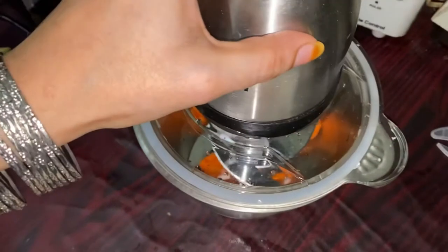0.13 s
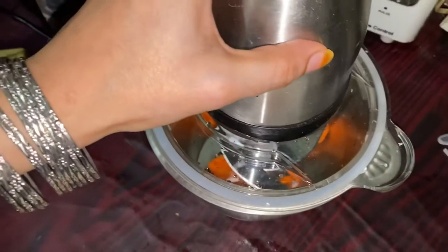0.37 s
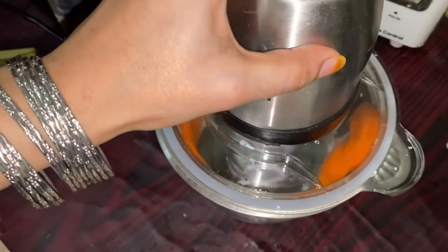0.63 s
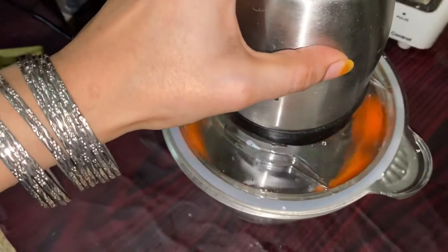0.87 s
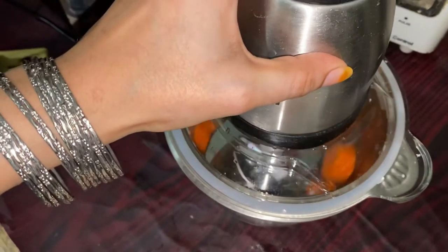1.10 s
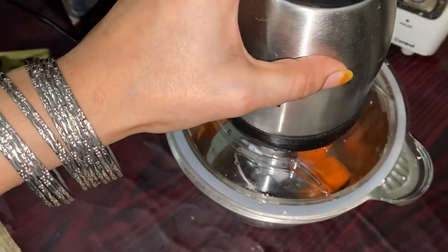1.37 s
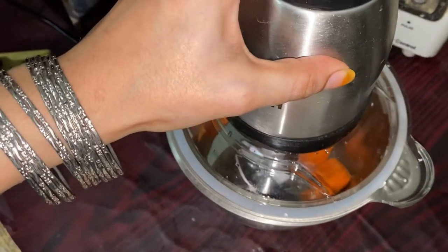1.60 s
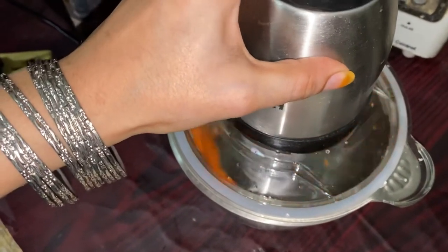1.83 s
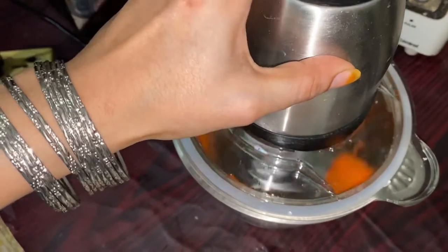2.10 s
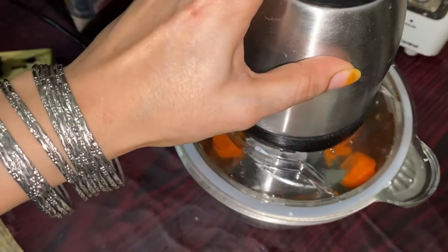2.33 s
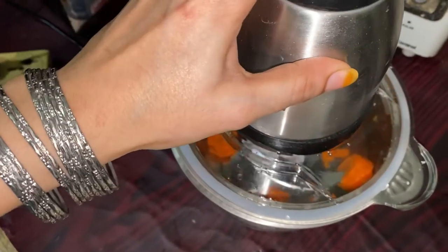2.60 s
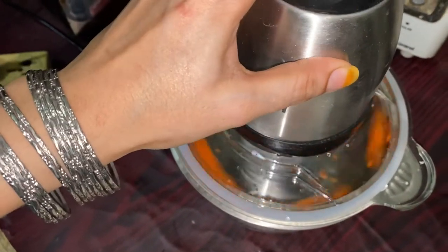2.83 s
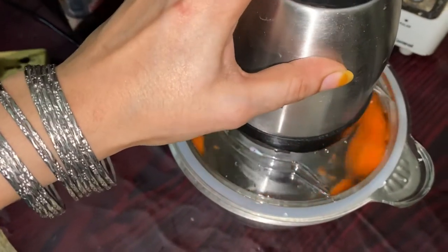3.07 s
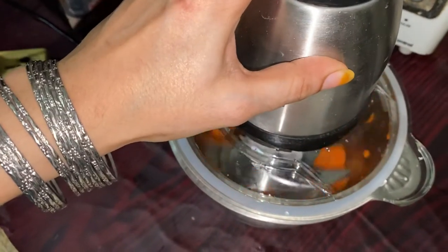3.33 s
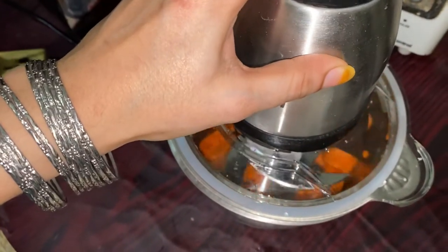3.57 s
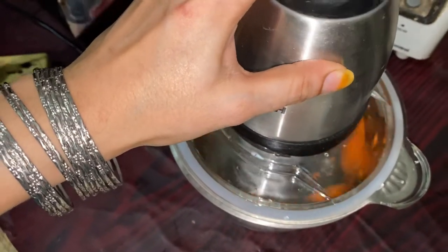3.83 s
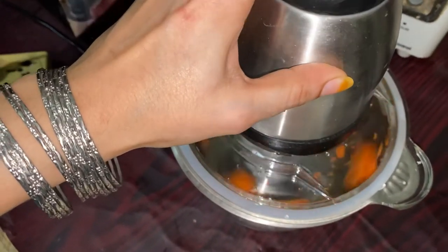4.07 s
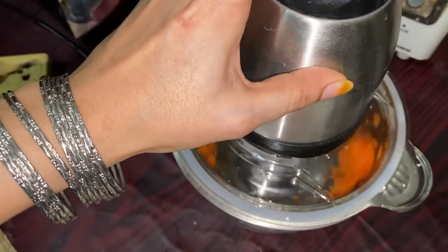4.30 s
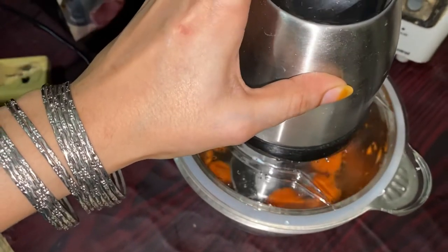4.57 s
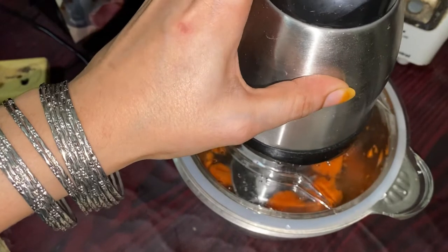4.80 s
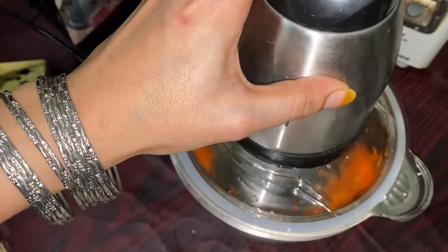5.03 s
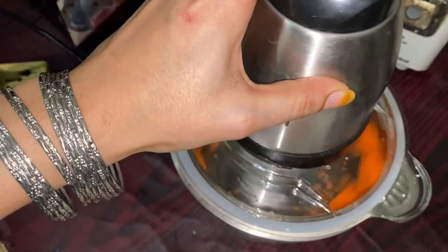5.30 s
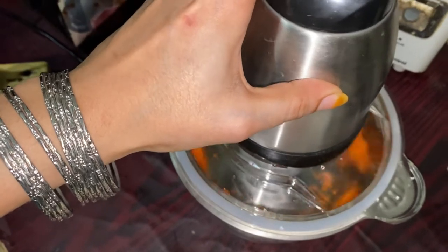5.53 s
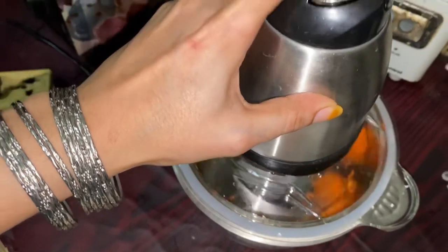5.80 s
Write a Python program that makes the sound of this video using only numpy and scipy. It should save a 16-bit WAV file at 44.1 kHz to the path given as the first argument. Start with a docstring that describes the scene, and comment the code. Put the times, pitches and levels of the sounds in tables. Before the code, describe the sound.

In a quiet room, thin metal bangles tick faintly, then an electric food chopper runs in five short bursts. Each time the geared motor whines upward, hard vegetable pieces knock and rattle loudly in the bowl, and the motor coasts down as they settle. Small metallic ticks fill the pauses. Close stereo pickup, slight dull room tail.

```python
"""Thin metal bangles tick in a quiet room, then a hand pulses an electric chopper over hard vegetable pieces
in a lidded bowl on a table. In each of five pulses the geared motor spins up: gears whine and grind, and the
unbalanced blade shaft throbs. Struck pieces knock and rattle round the bowl as noise bursts through resonances.
After switch-off the motor coasts down in pitch and the pieces settle. Bangles, made of noisy cracks and paired
sine tones, tick again in the pauses; filtered noise makes the quiet room throughout."""
import sys
import numpy as np
from scipy import signal
from scipy.fft import rfft, irfft
from scipy.io import wavfile
from scipy.ndimage import uniform_filter1d

SR = 44100
rng = np.random.default_rng(int(sys.argv[2]) if len(sys.argv) > 2 else 0)


def int16_out(signal):
    """Quantize to a 16-bit WAV file."""
    q = np.round(np.clip(np.atleast_2d(signal).T, -1, 1) * 32767)
    wavfile.write(sys.argv[1], SR, q.astype(np.int16))


def gain_from_db(level_db):
    """Convert decibel levels to linear amplitude factors (20 dB per decade)."""
    decades = np.asarray(level_db, float) / 20
    return 10 ** decades


N = 260631  # length in samples

# switch pulses: (on t/s, off t/s, spin-up time constant/s, coasting time constant/s)
SWITCH_PULSES = [(0.44, 0.64, .15, .3), (1.60, 1.805, .15, .25), (2.635, 2.865, .125, .25),
                 (3.545, 3.855, .125, .25), (4.895, 5.40, .138, .27)]
# work in the bowl, one row a pulse, levels at full speed:
# (blades bite t/s, pieces tumble on after switch-off/s, rattle level/dB, grind level/dB, throb level/dB)
BOWL_WORK = [(0.456, 0.35, -18, -28, -17), (1.616, 0.43, -17.5, -26.5, -24.5), (2.65, 0.35, -18, -27, -20),
             (3.55, 0.45, -18.5, -27, -17.5), (4.924, 0.39, -17, -28, -19)]
# how rattle, grind and throb follow the motor, one row each:
# (gain per doubling of speed/dB, loss while coasting/(dB/s), further loss once the pieces settle/(dB/s))
SPEED_RESPONSE = [(2.0, 20.5, 138), (4.0, 59, 171.5), (13.0, 39.5, 35)]
# loudest pieces struck or landing: (t/s, bowl peak level/dB, housing level/dB, table thud level/dB)
# housing and thud peaks are relative to the bowl peak
PIECE_KNOCKS = [(0.473, -6, -12, -14), (0.535, 0.5, -20.5, -23.5), (0.576, -10.5, -21.5, -12.5),
                (0.602, -13.5, -13, -18), (0.628, -19, -12, -12.5), (0.676, -12.5, -17, -12),
                (0.734, -20, -26, -13.5), (0.77, -15, -19, -13.5), (0.83, -12, -19, -10.5),
                (0.903, -11.5, -30, -16.5), (0.944, -16.5, -30, -12.5), (0.969, -14.5, -25, -13.5),
                (1.044, -25, -24, -7), (1.094, -29.5, -36, -6), (1.146, -27, -42, 0),
                (1.26, -44.5, -33, 11.5), (1.623, -8, -12, -15.5), (1.667, -4, -8, -15.5),
                (1.729, -10, -19, -16.5), (1.82, -1.5, -22.5, -24), (1.855, -10.5, -21.5, -13.5),
                (1.893, -9, -10, -10.5), (1.912, -7, -16, -11), (1.994, -16.5, -12, -13),
                (2.025, -9.5, -22, -14.5), (2.073, -17.5, -11, -21), (2.114, -16.5, -25, -18),
                (2.145, -19.5, -24, -16), (2.178, -27, -33, -8), (2.23, -13.5, -39, -9.5),
                (2.29, -16.5, -34, -3.5), (2.339, -25, -38.5, 1.5), (2.677, -15.5, -15, -6.5),
                (2.705, -22, -10.5, -6), (2.739, -4.5, -3.5, -17), (2.778, -13.5, -10, -13.5),
                (2.799, -6, -17, -15.5), (2.833, -4, -15.5, -18), (2.911, -5.5, -26, -15.5),
                (2.95, -8.5, -29, -20), (3.083, -8, -29, -9), (3.157, -15.5, -24, -16),
                (3.179, -17.5, -25, -10.5), (3.215, -22.5, -27, -11), (3.249, -31, 4, -6),
                (3.39, -41.5, -24, 11.5), (3.574, -15, -18, -19.5), (3.612, -15, -12, -16.5),
                (3.779, -6.5, -12, -13.5), (3.81, -5.5, -9, -9), (3.921, -11, -15, -3),
                (3.984, -13.5, -13, -12), (4.095, -7, -10, -15), (4.169, -13, -14, -16),
                (4.207, -34, -24, -1), (4.264, -25.5, -12, -9), (4.286, -16.5, -20, -17.5),
                (4.339, -21.5, -35, -6), (4.44, -23.5, -25, -10), (4.463, -32, -31, 5),
                (4.536, -35.5, -37, 2.5), (4.934, -15, -22, -10), (4.978, -4.5, -19, -17),
                (5.156, -10.5, -20, -12), (5.292, -4, -14, -16), (5.341, -8.5, -19, -9.5),
                (5.467, -11.5, -20, -3.5), (5.649, -11.5, -10, -16.5), (5.684, -17.5, -11, -15),
                (5.79, -33, 1, -5), (5.836, -27.5, -25, -15.5), (5.854, -21, -17, -22.5)]
# shaft throb: (multiple of the blade turn rate, level/dB)
SHAFT_TONES = [(1, -18), (2, 0), (3, -11), (4, -8)]
# resonances of bowl, lid and table: (f/Hz, width/Hz, level/dB)
BOWL_MODES = [(92.5, 37, -8), (180.4, 34, -4.5), (267, 38, 0.5), (347.4, 61, 2), (430, 97.4, -1.5),
              (625, 122, -6), (890.6, 128, -5), (1196, 212, -5), (1958, 258, -9.5), (2770, 120, -44),
              (3600, 150, -27.5), (6818, 333, -3)]
# resonances of the motor housing: (f/Hz, width/Hz, level/dB)
HOUSING_MODES = [(2008, 908, 2), (3070, 713, 3), (3654, 240, 2), (4473, 550, -3), (5950, 1370, -9.5),
                 (7130, 950, -21), (10600, 2000, -58.5), (14500, 2300, -65)]
# thud through the bowl's foot: (f/Hz, width/Hz, level/dB)
TABLE_MODES = [(87, 40, 2.5), (173, 41, 6)]
# bangle ticks: (t/s, ring level/dB, f/Hz, time to fall 60 dB if not damped/s, crack level ahead of its resonances/dB)
BANGLE_TICKS = [(0.114, -70, 2460, 0.051, -57), (0.176, -66, 2500, .05, -57), (0.225, -71, 1910, .05, -47),
                (0.271, -73.5, 4050, .05, -47), (1.031, -57, 2740, 0.84, -50),
                (1.492, -58.5, 4650, 0.17, -38.5), (2.24, -66, 3600, 0.23, -57),
                (2.4, -69, 1870, .3, -65.5), (2.564, -67, 2400, 0.041, -41), (3.414, -57, 2720, 0.13, -42),
                (3.428, -60, 1750, 0.82, -71), (4.47, -55, 1780, 0.34, -65), (4.773, -48, 4330, 0.036, -47)]
# colour of the quiet room: (f/Hz, level per Hz/dB), relative
ROOM_COLOUR = [(15, -42.5), (25, -11.5), (80, -3), (124, -14.5), (527, -26.5), (648, -31.5), (718, -30),
               (776, -27.5), (1970, -39.5), (2750, -52), (4270, -52.5), (5120, -63), (12000, -63.5),
               (15600, -100.5), (22000, -120)]
# response of the sum of both microphones, with notches where they cancel: (f/Hz, level/dB)
MIC_SUM = [(100, 1), (7000, -4.5), (8200, -2.5), (9100, -24), (10000, -3), (12000, -10), (13200, -22.5),
           (14500, -12), (16000, -19)]
# stereo width: (f/Hz, level of the side signal/dB)
STEREO_WIDTH = [(30, 8), (60, -17.5), (110, -12), (200, -9), (380, -5.5), (700, -0.5), (1290, -4),
                (2380, -7), (4400, -3.5), (6000, 2), (8000, -8), (9100, 28), (10500, -13), (13000, 3),
                (15000, -2)]
# part of the side signal that follows the mid: (f/Hz, share 0-1, phase/rad)
SIDE_TIED_TO_MID = [(60, .6, 3.5), (130, 0.4, -5), (260, 0.4, 0.5), (550, 0.7, -1.5), (1111, 0.6, -2),
                    (2200, .6, -2), (4400, 0.9, -1.16), (7000, .7, -2), (12000, .8, -1.5)]

TOP_MESH_HZ = 3600   # tooth contacts per second that the motor heads for
MESH_PER_TURN, TEETH = 70.0, 12.0   # tooth contacts per blade turn, per rotor turn
WHINE_DB, STARTING_DB = -28.5, 3.5   # the gears are loaded harder while the motor gathers speed
BITE_S = 0.0061   # sound swells as the blades meet the pieces
DAMPED_AFTER_S = 0.11   # skin stops a ringing bangle
ROOM_DB = -52.5


def spin():
    """The gear pitch climbs while the switch is held and decays after release; whine level follows."""
    t = np.arange(N) / SR
    mesh_hz, whine_db = np.zeros(N), np.full(N, -120.)
    for on, off, rise, coast in SWITCH_PULSES:
        after = t > on
        coasting = np.maximum(t - off, 0)
        powered_speed = 1 - np.exp(-(np.clip(t, on, off) - on) / rise)
        speed = powered_speed * np.exp(-coasting / coast)
        mesh_hz[after] = TOP_MESH_HZ * speed[after]
        starting_db = STARTING_DB * (1 - speed) * (t < off)
        unloaded_db = -35 * coasting - 70 * coasting ** 2   # tooth load fades while coasting
        backlash_db = -60 * np.exp(-(np.abs(t - on) / .03) ** 4)   # teeth meet once the slack is taken up
        whine_db[after] = (WHINE_DB + starting_db + unloaded_db + backlash_db)[after]
    return mesh_hz, whine_db


def work(mesh_hz):
    """Rattle, grind and throb levels rise with speed, fall while coasting, and fall faster once pieces settle."""
    t = np.arange(N) / SR
    levels_db = np.full((3, N), -150.)
    per_doubling, coast_db, settle_db = np.transpose(SPEED_RESPONSE)[:, :, None]
    for (bite, tumble, *top_db), (on, off, rise, coast) in zip(BOWL_WORK, SWITCH_PULSES):
        now = t[t > bite]
        doublings = np.log2(1 - np.exp(-(np.minimum(now, off) - on) / rise))
        swell_db = 20 * np.log10(1 - np.exp(-((now - bite) / BITE_S) ** 2) + 1e-6)
        coast_loss_db = coast_db * np.maximum(now - off, 0)
        settle_loss_db = settle_db * np.maximum(now - off - tumble, 0)
        speed_db = per_doubling * doublings
        levels_db[:, t > bite] = np.c_[top_db] + speed_db + swell_db - coast_loss_db - settle_loss_db
    return levels_db


def whine(turns, level_db):
    """Tooth contacts make a gritty band round the mesh rate, since every pair meets with another force."""
    runout = .17 * np.sin(2 * np.pi * MESH_PER_TURN / TEETH * turns)   # the rotor runs slightly off centre
    mesh_phase = 2 * np.pi * (MESH_PER_TURN * turns + runout)
    force = [.8 + .8 * drift(115.0) + .8j * drift(115.0) for row in range(2)]
    chopping_db = 2.5 * drift(30.0)   # each cut loads the gears
    return gain_from_db(level_db + chopping_db) * np.real(force * np.exp(1j * mesh_phase))


def grind(turns, level_db):
    """Gears, brushes and the blade edge make dense fine grains that ring in the housing."""
    uneven_db = 1.9 * drift(40.0) + 0.5 * np.cos(4 * np.pi * turns)   # twice a blade turn
    fine = grains(9000., spread_db=0.5) * gain_from_db(uneven_db)
    ringing = evened(body(fine, HOUSING_MODES), seconds=0.48)
    return gain_from_db(level_db + 2.0) * ringing   # 2 dB on top of the table's level


def throb(turns, mesh_hz, level_db):
    """Blade unbalance shakes the table, and takes over the bass from random bumps as the speed rises."""
    share = np.clip((mesh_hz - 2000.) / 1200.0, 0, 1)
    tones = 0
    for multiple, db in SHAFT_TONES:
        strength = gain_from_db(db + 1.1 * drift(9.6))
        tones = tones + strength * np.sin(2 * np.pi * multiple * turns + 0.56 * drift(11.0))
    table = [(86.0, 33, -3.5), (183, 40.8, 5.0)]   # f/Hz, width/Hz, level/dB
    bumps = evened(body(grains(300., spread_db=2.0), table), seconds=0.39)
    direct_tones = np.sqrt(2) * tones * [[1], [0]]   # no scattered twin
    return gain_from_db(level_db) * (share * direct_tones + (1 - share) * 0.98 * bumps)


def rattle(turns, mesh_hz, level_db):
    """Pieces hit blade and wall in clumps, most often as a blade passes; they thin out as the blades slow."""
    passing = (1 + 0.64 * np.cos(4 * np.pi * turns)) * gain_from_db(4.0 * drift(25.0))   # two passes a turn
    hits = soft(grains(.7 * (mesh_hz + 300.) * passing, spread_db=2.5), cut_hz=1740.0)
    slowing = np.gradient(mesh_hz) < 0
    settling_db = -7 * np.clip(1 - mesh_hz / 1500, 0, 1) ** .5 * slowing
    smooth_db = uniform_filter1d(settling_db, size=400)
    return gain_from_db(level_db + smooth_db) * evened(body(hits, BOWL_MODES), seconds=0.13)


def knocks():
    """Each knock is a few contacts dying within milliseconds, ringing bowl, housing and table."""
    length = 4000   # samples
    out, t = np.zeros((2, N + length)), np.arange(length) / SR
    hit, rocking = np.exp(-t / 0.0035), 0.18 * np.exp(-t / 0.026)
    envelope = (1 - np.exp(-t / 0.00065)) * (hit + rocking)
    noises = rng.standard_normal((len(PIECE_KNOCKS), 2, length))
    for (s, peak_db, bright_db, thud_db), noise in zip(PIECE_KNOCKS, noises):
        blow = noise * envelope
        dull = body(soft(soft(blow, cut_hz=1310.0), cut_hz=2500.0), BOWL_MODES)
        bright = body(soft(blow, cut_hz=4000.0), HOUSING_MODES)
        thud = body(blow, TABLE_MODES)
        knock = dull / np.abs(dull).max()
        knock = knock + gain_from_db(bright_db) * bright / np.abs(bright).max()
        knock = knock + gain_from_db(thud_db) * thud / np.abs(thud).max()
        start = round(s * SR)
        out[:, start:start + length] += gain_from_db(peak_db) * knock
    return out[:, :N]


def bangles():
    """A tick is a short noisy crack and a thin-metal mode with a weak close partner."""
    out, t = np.zeros((2, N + SR)), np.arange(SR // 2) / SR
    crack_fade = np.exp(-t / 0.0013) + 0.085 * np.exp(-t / .02)
    cracks = rng.standard_normal((len(BANGLE_TICKS), 2, len(t))) * crack_fade
    phases = rng.random((len(BANGLE_TICKS), 2))   # in cycles
    damping_db = -900. * np.maximum(t - DAMPED_AFTER_S, 0)
    for (s, ring_db, hz, t60, crack_db), (a, b), noise in zip(BANGLE_TICKS, phases, cracks):
        mode = np.sin(2 * np.pi * (hz * t + [[a], [b]]))
        partner = .2 * np.sin(2 * np.pi * (1.04 * hz * t + [[b], [a]]))
        ring = gain_from_db(ring_db - 60 * t / t60 + damping_db) * (mode + partner)
        crack = body(noise, [(hz, 400, 0), (hz / 3.3, 1500, -7)])
        start = round(s * SR)
        out[:, start:start + len(t)] += ring + gain_from_db(crack_db) * crack
    return out[:, :N]


def room():
    """Quiet coloured air: filtered noise whose level wavers."""
    hz = np.fft.rfftfreq(N, 1 / SR) + 1   # 1 added to keep the logarithm finite
    air = irfft(rfft(rng.standard_normal((2, N))) * gain_from_db(at_hz(ROOM_COLOUR, hz)), N)
    return gain_from_db(ROOM_DB + 2.0 * drift(4.6)) * rms_one(air)


def grains(per_s, spread_db):
    """Random contacts of uneven size; the two rows share times and sizes but not signs."""
    size = gain_from_db(spread_db * np.minimum(rng.exponential(1, N), 4))
    born = (rng.random(N) < per_s / SR) * size
    return born * rng.choice([-1, 1], (2, N))


def soft(x, cut_hz):
    """Vegetable is soft, so its contacts last longer and lose their top."""
    return signal.sosfilt(signal.butter(2, cut_hz, fs=SR, output="sos"), x)


def body(x, resonances):
    """An object rings at several resonances side by side, added with alternating signs."""
    out = 0
    for k, (hz, width, level_db) in enumerate(resonances):
        r = np.exp(-np.pi * width / SR)   # a wider resonance dies sooner
        feedback = [1, -2 * r * np.cos(2 * np.pi * hz / SR), r * r]
        ringing = signal.lfilter([1, 0, -1], feedback, x + 1e-18)
        out = out + (-1) ** k * gain_from_db(level_db) * (1 - r * r) * ringing
    return out


def drift(rate):
    """Random wandering of rms 1: noise smoothed by two equal low-pass steps at rate, in Hz."""
    r = np.exp(-2 * np.pi * rate / SR)
    noise = rng.standard_normal(N + 20000)
    return rms_one(signal.lfilter([1], [1, -2 * r, r * r], noise)[20000:])   # drop the filter's start


def evened(x, seconds):
    """Slow level changes divided out, so that a level curve sets them."""
    power = uniform_filter1d(np.mean(x ** 2, axis=0), size=int(seconds * SR))
    return x / np.sqrt(power + 1e-12)


def rms_one(x):
    """Scale to rms 1."""
    return x / np.sqrt(np.mean(x ** 2) + 1e-20)


def at_hz(points, hz, axis=1):
    """Read a table column between its points on a log-frequency axis."""
    points = np.array(points)
    return np.interp(np.log(hz), np.log(points[:, 0]), points[:, axis])


def echo(x, t60, wet_db):
    """Walls return a short dull tail: fading low-passed noise, convolved with the sound."""
    t = np.arange(int(.5 * SR)) / SR
    dull_noise = signal.lfilter([1], [1, -.7], rng.standard_normal(len(t)))
    tail = dull_noise * gain_from_db(-60 * t / t60) * (t > .006)
    wet = signal.fftconvolve(x, [tail / np.linalg.norm(tail)], axes=1)[:, :N]
    return x + gain_from_db(wet_db) * wet


def microphone_pair(direct, scattered):
    """Side = a phase-turned part of the direct sound plus scattered sound, by band."""
    hz = np.fft.rfftfreq(N, 1 / SR) + 1
    mid, other = rfft([direct, scattered]) * gain_from_db(at_hz(MIC_SUM, hz))
    share = np.clip(at_hz(SIDE_TIED_TO_MID, hz), 0, 1)
    tied = share * np.exp(1j * at_hz(SIDE_TIED_TO_MID, hz, axis=2)) * mid
    side = gain_from_db(at_hz(STEREO_WIDTH, hz)) * (tied + np.sqrt(1 - share ** 2) * other)
    return irfft([mid + side, mid - side], N)


def scene():
    """Row 0 of every source is its direct sound, row 1 its scattered twin."""
    mesh_hz, whine_db = spin()
    rattle_db, grind_db, throb_db = work(mesh_hz)
    turns = np.cumsum(mesh_hz) / MESH_PER_TURN / SR   # blade turns so far
    machine = whine(turns, whine_db) + grind(turns, grind_db) + throb(turns, mesh_hz, throb_db)
    chopper = machine + rattle(turns, mesh_hz, rattle_db) + knocks()
    bass_cut = signal.butter(4, 60.0, "high", fs=SR, output="sos")
    small = signal.sosfilt(bass_cut, chopper)   # too small to radiate deep bass
    direct, scattered = echo(small + bangles(), t60=.3, wet_db=-16.0) + room()
    return microphone_pair(direct, scattered)


def band_limit(x):
    """A steep low-pass at the top of the band."""
    return signal.sosfilt(signal.butter(12, 16500, fs=SR, output="sos"), x)


def record(dry):
    """A small microphone cuts the bass, and loud peaks are rounded."""
    cut = signal.sosfilt(signal.butter(2, 45.0, "high", fs=SR, output="sos"), dry)
    mix = np.tanh(cut)
    return band_limit(mix)


dry = scene()
out = record(dry)
int16_out(out)
```